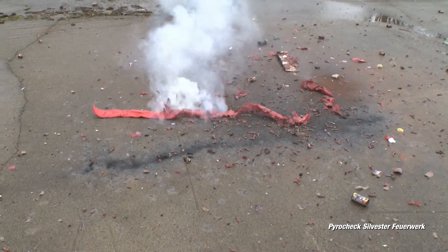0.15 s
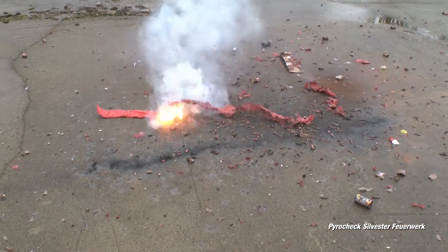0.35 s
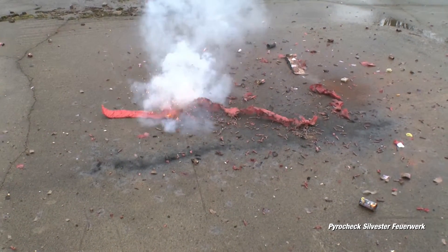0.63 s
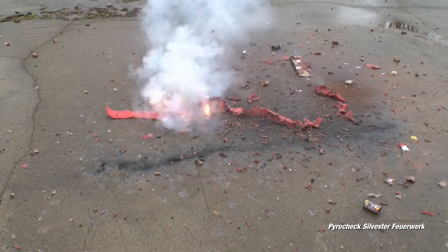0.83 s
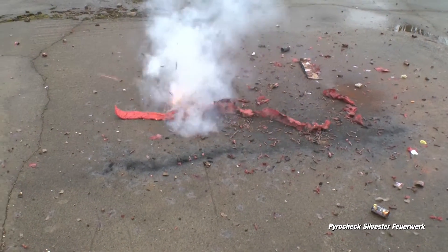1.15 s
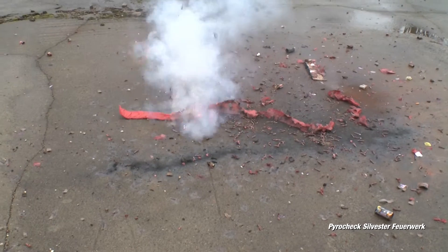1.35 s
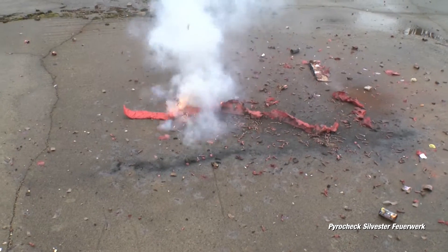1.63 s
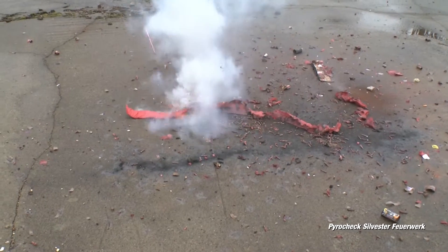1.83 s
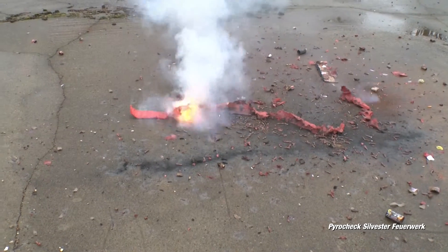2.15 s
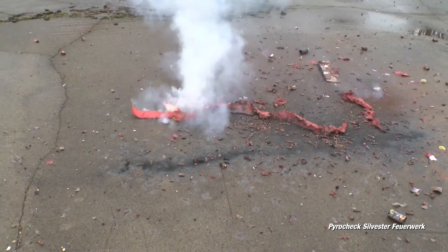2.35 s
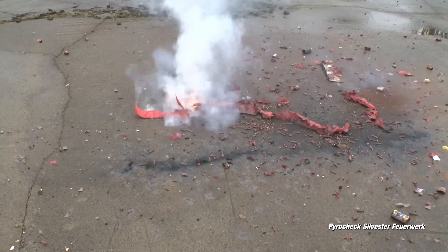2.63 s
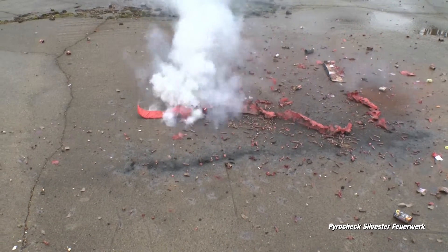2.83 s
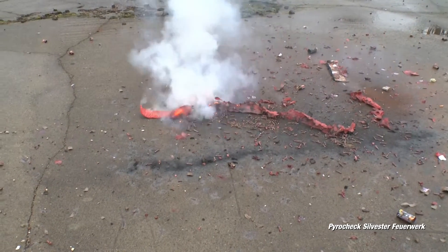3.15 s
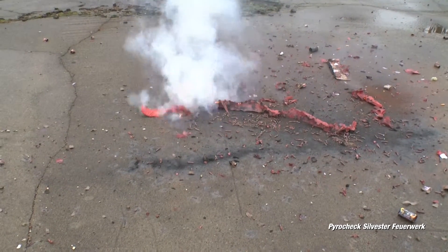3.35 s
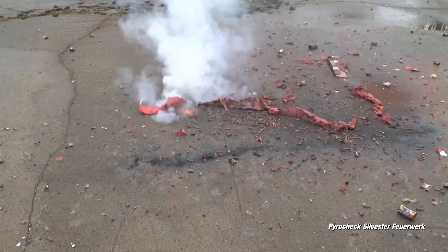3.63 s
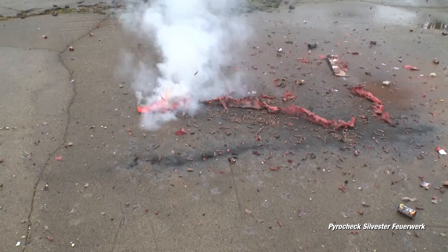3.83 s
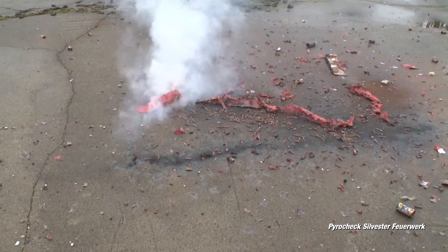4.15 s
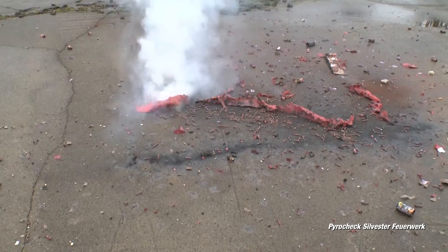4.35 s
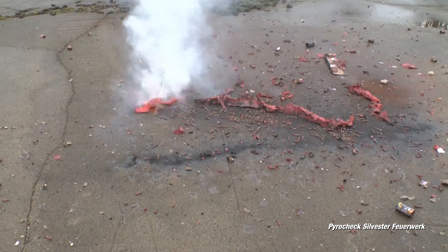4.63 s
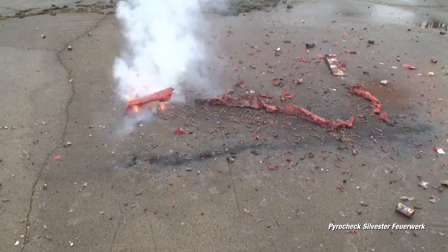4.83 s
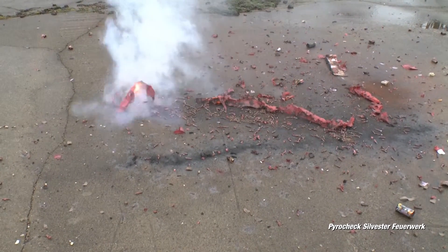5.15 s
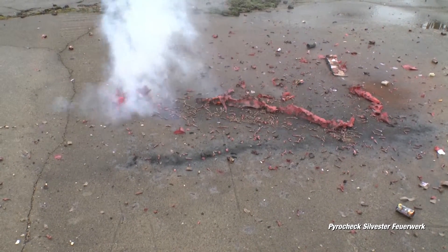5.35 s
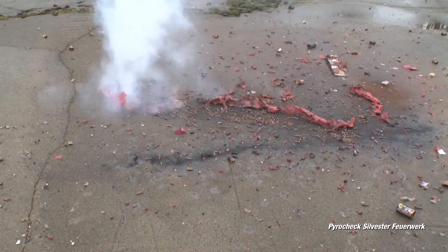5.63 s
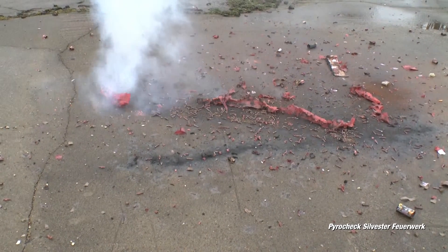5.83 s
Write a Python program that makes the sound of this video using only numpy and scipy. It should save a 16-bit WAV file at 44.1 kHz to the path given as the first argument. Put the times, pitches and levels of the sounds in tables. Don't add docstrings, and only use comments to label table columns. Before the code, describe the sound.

A string of firecrackers goes off on a concrete yard a few metres from a stereo microphone. Very short, hard cracks come in uneven clusters with small gaps, some bright and papery, others dull with a low thump. Each bounces off the ground and returns as quick, faint slaps from distant walls and trees. The loudest overload softly. The bangs grow sparser at the end, leaving fading echoes over faint open air.

```python
import sys
import numpy as np
from scipy import signal
from scipy.fft import rfft, irfft, next_fast_len
from scipy.io import wavfile
from scipy.ndimage import uniform_filter1d, minimum_filter1d

SR = 44100
rng = np.random.default_rng(int(sys.argv[2]) if len(sys.argv) > 2 else 0)


def field_ratio(decibels):
    return 10 ** (np.asarray(decibels, dtype=float) / 20)


def persist_wave(psi):
    counts = np.round(np.clip(psi, -1, 1) * 32767).astype(np.int16)
    wavfile.write(sys.argv[1], SR, np.atleast_2d(counts).T)


N = 264600


def along(points, hz):
    f, value = np.transpose(points)
    return np.interp(np.log(hz + 1), np.log(f + 1), value)


def filtered(x, response):
    m = next_fast_len(x.shape[-1] + 8192)
    return irfft(rfft(x, m) * response(np.fft.rfftfreq(m, 1 / SR)), m)[..., :x.shape[-1]]


def ringing(table, late):
    t = np.maximum(np.arange(1500) / SR - late, 0)
    out = 0
    for hz, width, db, way in table:
        out = out + np.sign(way) * field_ratio(db) * np.exp(-np.pi * width * t) * np.sin(2 * np.pi * hz * t)
    return out


def rung(x, table, late):
    return signal.fftconvolve(x, ringing(table, late)[None], axes=1)[:, :N]


def no_bass(hz):
    return 1j * hz / (120 + 1j * hz)


# (t/s, front level/dB, gas push level/dB, body level/dB)
SHRED_DULL = [(.2343,-7,-27.5,-15.5),(.3389,-12,-19,-9),(.3475,-21.5,-12,4),(.4383,-11.5,-23.5,-7),(.738,-35,-26,-17),(.7449,-14,-21,-6.5),(.8309,-15,-26.5,-8.5),(.8884,-17.5,-23.5,-5),(1.0162,-19,-22,-2.5),(1.2413,-14.5,-16,-5.5),(1.262,-17.5,-23,-7.5),(1.3228,-17,-54,-4.5),(1.4958,-15,-17.5,-9),(1.5889,-13,-19.5,-6.5),(1.6112,-25.5,-18,7.5),(2.1196,-18.5,-12,-0.5),(2.1872,-17.5,-24,-8.5),(2.8317,-12,-23.5,-12),(3.0524,-17,-37,-13.5),(3.2731,-18,-17,-2.5),(3.2981,-18,-8,1),(3.3534,-20,-19,0.5),(3.5069,-19,-8,-2),(4.2624,-14.5,-22,-7),(4.9524,-23.5,-1.5,-6),(4.9593,-19.5,-9,-4),(5.237,-24.5,-20,-4),(5.4196,-14.5,-19,-5.5),(5.659,-15.5,-8,-1.5)]
SHRED_EVEN = [(.4796,-15,-9,-4),(.5176,-13,-19.5,-11.5),(.543,-15.5,-36,-13),(.5514,-15.5,-36,-6),(.5573,-21,-15.5,-3),(.5678,-16,-29,-15),(.604,-28,-6,-1),(.7163,-15,-18.5,-3.5),(1.0843,-13,-21.5,-12),(1.105,-19.5,-20,-6),(1.3305,-20,-12.5,-0.5),(1.3384,-17.5,-8,-2),(1.614,-17,-25,-11),(1.6731,-13.5,-22,-17),(2.066,-12,-8,-7),(2.4763,-25.5,-16,6),(2.5759,-15,-12.5,-5),(3.1882,-32,-5,-19),(3.3905,-19,-23,-2),(3.8234,-17.5,-25,-2.5),(3.8475,-19,-7.5,0),(4.1901,-21.5,-9,2),(4.1923,-14,-21.5,-12),(4.6349,-20,-7.5,3.5),(4.949,-34,-34,-14),(4.9509,-15,-23,-10.5)]
SHRED_BRIGHT = [(.2966,-8,-29,-16),(.5952,-14,-28,-7),(.625,-20,-7,0),(1.5105,-34,-29,-23),(1.5922,-39,-16,-32),(1.7711,-13,-8,-10.5),(2.3526,-14.5,-17.5,-11),(2.4103,-13,-16.5,-9.5),(2.9099,-17.5,-10,-5),(2.9145,-17,-18,-10.5),(3.1532,-19,-9,0.5),(3.1654,-15,-15,-4.5),(3.1795,-14,-20,-14),(3.3385,-19.5,-22,-2.5),(3.6893,-15,-18,-6),(4.0136,-13.5,-21.5,-7.5),(4.0408,-14.5,-28,-8),(4.0542,-51,-32,-21),(4.0651,-17,-21,-9.5),(4.6564,-19,-24,-4),(4.6616,-18,-17,-3),(4.7166,-19,-8.5,-3),(4.9187,-15,-25,-9),(5.1378,-25,-4,7),(5.3285,-17,-26,-5)]
SPLIT_DULL = [(.1092,-16,-9,-1.5),(.2094,-11,-19,-5.5),(.5656,-12,-40,-11),(.7216,-44,-12,-8),(.8617,-13.5,-7,-7.5),(.942,-40,-9,-18),(1.1457,-21.5,-8,3.5),(1.5075,-25.5,-22,-1.5),(1.5717,-17,-25,-5),(2.1416,-31,-13,4.5),(2.1575,-16.5,-12,-2),(2.5062,-18,-20.5,-6),(2.931,-18.5,-29,-2.5),(3.8936,-26.5,-21,0),(4.222,-30.5,-10.5,-6),(4.237,-24.5,-8.5,3.5),(4.4062,-21.5,-7.5,2.5),(4.7875,-17.5,-2.5,-2),(4.8034,-12,-25,-14.5)]
SPLIT_EVEN = [(.261,-25,-18,1),(.3734,-32.5,-13,-1),(.6474,-11.5,-23,-10.5),(.7673,-25.5,-28,-6),(.9399,-18.5,-22,-1.5),(.9678,-13,-24,-11),(1.171,-23.5,-22,-6),(1.6709,-17.5,-14,0.5),(1.8066,-27,-26,-0.5),(2.5403,-27.5,-25,2),(2.7535,-21.5,-36,-2),(2.8513,-25.5,-8,7),(3.1889,-24,-12,0.5),(3.6318,-8.5,-23.5,-14.5),(3.7154,-17.5,-9,-6),(3.7737,-19.5,-18.5,-2),(3.941,-20,-25,-2.5),(4.4454,-28.5,-5.5,10.5),(4.7258,-32.5,-5,10.5),(4.798,-25.5,-9,-1),(4.8927,-26,-12.5,-6),(4.8975,-16,-7,-7.5),(4.9546,-16.5,-41,-17),(5.0704,-15,-20.5,-10.5),(5.0766,-29.5,-14,6)]
SPLIT_BRIGHT = [(.3211,-17.5,-40,-6.5),(.5246,-17.5,-32,-11),(.7888,-20.5,-15.5,1.5),(.9727,-15,-23,-4.5),(1.4693,-13,-25,-13),(1.8533,-11.5,-20.5,-13),(1.8809,-17.5,-25.5,-5),(2.3679,-12.5,-34,-13.5),(2.4256,-18.5,-21,-11),(2.5829,-14.5,-24,-8),(2.6156,-20.5,-14.5,-1),(2.7029,-12,-20,-6.5),(2.745,-17,-24,-3.5),(2.7713,-21,-28,-6),(2.8554,-24,-6.5,4),(2.9268,-20,-17,0),(2.9388,-15,-25.5,-20),(3.0635,-11.5,-30.5,-16.5),(3.3978,-18.5,-18.5,-3),(3.7241,-14.5,-22.5,-12),(3.8695,-13.5,-10,-8.5),(4.056,-17,-23,-9),(4.1307,-16.5,-22,-7),(4.6929,-18,-29,-4),(4.7227,-17,-11,-2),(4.7287,-21.5,-7.5,-8),(4.7557,-22.5,-21,0.5),(4.8281,-26,-8.5,3),(5.297,-24.5,-5.5,5)]
SHRED_DB, SPLIT_DB = -5, -9.5
DULL_DB, EVEN_DB, BRIGHT_DB = 3.5, -1.5, -9
KINDS = [(SHRED_DULL, SHRED_DB, DULL_DB), (SHRED_EVEN, SHRED_DB, EVEN_DB), (SHRED_BRIGHT, SHRED_DB, BRIGHT_DB),
         (SPLIT_DULL, SPLIT_DB, DULL_DB), (SPLIT_EVEN, SPLIT_DB, EVEN_DB), (SPLIT_BRIGHT, SPLIT_DB, BRIGHT_DB)]
BANGS = sorted((*row, tear_db, dull_db) for rows, tear_db, dull_db in KINDS for row in rows)
BANG_S, FRONT_DB, PUSH_DB, BODY_DB, TEAR_DB, TONE_DB = np.transpose(BANGS)


def bursts(db, shapes):
    out = np.zeros((2, N + shapes.shape[-1]))
    for s, gain, shape in zip(BANG_S, field_ratio(db), shapes):
        out[:, round(s * SR):][:, :shape.shape[-1]] += gain * shape
    return out[:, :N]


def blasts(spike_db, tear_db, tear_t60, apart, pan_db, size=400):
    t = np.arange(size) / SR
    draw = rng.standard_normal((len(BANGS), 3, size))
    shared = draw[:, :1] * np.abs(draw[:, :1])
    spits = field_ratio(-60 * t / tear_t60) * (shared + apart * draw[:, 1:])
    spits = spits / np.sqrt(np.sum(spits ** 2, (1, 2), keepdims=True))
    shapes = field_ratio(tear_db)[:, None, None] * spits
    shapes[:, :, 0] = field_ratio(spike_db + pan_db * draw[:, :1, 0] * [.5, -.5] + [.6, -.6])
    shapes[:, :, 1] = shapes[:, :, 0] * 0.11 * draw[:, :1, 1] * [1, -1]
    return shapes


# (f/Hz, level/dB)
SHOCK = [(300, -56), (1250, -30), (2500, 6), (4300, 6.5), (6200, 13), (7400, 7), (9000, 10), (10800, 5),
         (12000, 4), (15500, -7), (17000, 3)]
# (delay t/s, gain)
REPEATS = [(.00016, -.55), (.00025, -.4), (.00047, .3), (.00065, -.2), (.0021, .12)]


def cracks():
    shock = blasts(0, .5 * TEAR_DB - 1, tear_t60=.002, apart=.3, pan_db=1.5)
    paper = blasts(-23, TEAR_DB + 11.0, tear_t60=0.0041, apart=0.33, pan_db=2.0)
    repeated = lambda hz: 1 + sum(gain * np.exp(-2j * np.pi * hz * s) for s, gain in REPEATS)
    crack = paper - filtered(shock, repeated)
    mids = bursts(FRONT_DB + 0.37 * TONE_DB + 5.0, crack)
    treble = bursts(FRONT_DB - 0.44 * TONE_DB + 2, crack)
    upper = lambda hz: 1 / (1 + (6400 / (hz + 1)) ** 8)
    crossed = mids + filtered(treble - mids, upper)
    return filtered(crossed, lambda hz: field_ratio(along(SHOCK, hz)))


# (f/Hz, width/Hz, level/dB, first swing +-)
HOUSING = [(1463, 78, -16, 1), (1917, 238, 0.5, 1), (2433, 500, 5.5, 1), (3000, 630, 2, -1),
           (3290, 400, -1, 1), (3900, 840, 4, -1)]


def housing():
    hits = blasts(0, 0.2 * TEAR_DB - 8.5, tear_t60=0.013, apart=0.37, pan_db=5.5)
    return filtered(rung(bursts(FRONT_DB + BODY_DB, hits), HOUSING, 0.00015), no_bass)


# (f/Hz, width/Hz, level/dB, first swing +-)
GROUND = [(500.7, 133, 7.5, -1), (715, 59, -10.5, -1), (960, 2380, 17.5, 1), (1150, 440, -11.5, 1)]


def ground():
    hits = blasts(0, 0.31 * TEAR_DB - 3.0, tear_t60=0.048, apart=2.0, pan_db=0.0)
    hit_db = FRONT_DB + 0.41 * PUSH_DB + 0.28 * BODY_DB - 6.5
    return filtered(rung(bursts(hit_db, hits), GROUND, 0.0004), no_bass)


# (f/Hz, width/Hz, level/dB, first swing +-)
PUSH = [(138.3, 127.4, 3.5, 1), (343, 150, -2.5, -1), (66, 130, -10.5, -1)]
HEAVY = [(218, 153, 7, 1), (102, 62, -8.5, -1), (66.6, 76, -7.5, -1), (300, 1300, -17, 1)]


def gas():
    puffs = blasts(0, 0.13 * TEAR_DB - 0.5, tear_t60=0.016, apart=0.098, pan_db=4.5)
    heavy = np.clip((PUSH_DB + 13.0) / 6, 0, 1)[:, None, None]
    push = bursts(FRONT_DB + PUSH_DB + 8.0, puffs * (1 - heavy))
    thud = bursts(FRONT_DB + PUSH_DB + 2.5, puffs * heavy)
    return rung(push, PUSH, 0.0013) + rung(thud, HEAVY, 0.00046)


# (t/s,
# level/dB, f/Hz)
NOTES = [(0.1082, -8, 6660), (0.208, -2, 5900), (0.2326, -1, 5250), (0.2593, -16, 3380),
         (0.2957, -32, 6320), (0.3197, -4, 2800), (0.3376, -11, 5300), (0.4374, -14, 4200),
         (0.4783, -10, 3430), (0.5162, -6, 9400), (0.5501, -32, 2880), (0.5501, 3, 10300),
         (0.594, -18, 8550), (0.624, 2, 3400), (0.6464, -17, 9960), (0.7153, -3, 4030),
         (0.7437, 1, 4000), (0.7662, -14, 3310), (0.7876, -6, 3220), (0.8295, -5, 8800),
         (0.8604, -6, 4000), (0.8869, 3, 3950), (0.9388, -20, 2750), (0.9667, -8, 6490),
         (1.0151, -3, 5870), (1.0829, 2, 8700), (1.1039, -15, 4530), (1.1448, -4, 5800),
         (1.1702, -12, 5660), (1.2401, -14, 5130), (1.261, -1, 6460), (1.3219, -4, 6300),
         (1.4681, 4, 8600), (1.4945, 3, 6700), (1.5703, -12, 6250), (1.5878, -8, 6500),
         (1.6127, -12, 5270), (1.672, -19, 8380),
         (1.7702, -4, 10500), (1.8056, -20, 2800), (1.852, -16, 8400), (1.8794, -7, 9000),
                (2.065, 3, 3000), (2.1184, -7, 6300), (2.1403, -22, 2860), (2.1563, -12, 4100),
                (2.1857, -15, 5700), (2.3514, 3, 8400), (2.4092, 1, 8430), (2.4751, -5, 2730),
                (2.505, -6, 6100), (2.5389, -13, 8610), (2.5743, -8, 8200), (2.6143, -15, 2750),
                (2.7021, -21, 9450), (2.7435, -19, 2900), (2.7699, -2, 8750), (2.8308, -27, 5740),
                (2.8507, -21, 3750), (2.9086, -3, 9500), (3.0513, -1, 8870), (3.0622, -16, 8600),
                (3.1525, -4, 8500), (3.2718, -17, 5680), (3.2972, -11, 3900), (3.3371, -13, 4490),
                (3.389, 2, 8380), (3.4708, -31, 3100), (3.5057, 4, 4180),
         (3.6308, -24, 8700), (3.6881, -7, 8300), (3.7141, -2, 9500), (3.7724, -14, 4500),
              (3.8228, -6, 2800), (3.8463, -8, 3900), (3.8682, -5, 4400), (3.8922, -14, 3290),
              (3.9396, -4, 4160), (4.0129, 2, 4260), (4.0398, -17, 8400), (4.1291, -19, 9200),
              (4.189, -6, 2880), (4.2359, -16, 2860), (4.2624, -8, 4440), (4.405, -1, 4300),
              (4.4444, -7, 2780), (4.634, -8, 2680), (4.656, -15, 4600), (4.6914, -18, 2780),
              (4.7158, -7, 2770), (4.7557, -13, 2840), (4.7861, -2, 4640), (4.827, -22, 2930),
              (4.8964, -33, 6400), (4.8964, -15, 6650), (4.9178, -15, 9200), (4.9498, -11, 6560),
              (5.069, -16, 2830), (5.138, -20, 2870), (5.2366, -14, 2940), (5.296, -18, 2760),
              (5.3274, -9, 9600), (5.4188, -12, 6700), (5.5913, -42, 3080), (5.6577, -22, 4300)]
NOTE_DB, NOTE_LATE_S, NOTE_WIDTH_HZ = -7, .0001, 610


def notes():
    out = np.zeros((2, N + 400))
    t = np.arange(400) / SR
    envelope = np.exp(-np.pi * NOTE_WIDTH_HZ * t) * (1 - np.exp(-t / 0.00032))
    rows = NOTES
    for (s, db, hz), side in zip(rows, rng.standard_normal((len(rows), 1))):
        near = BANG_S[np.argmin(np.abs(BANG_S - s - .001))]
        if abs(near - s) < .004:
            gain = field_ratio(db + NOTE_DB + 1.3 * side * [[1], [-1]])
            out[:, round((near + NOTE_LATE_S) * SR):][:, :400] += gain * envelope * np.sin(2 * np.pi * hz * t)
    return out[:, :N]


# (t/s, level/dB, f/Hz)
THUMPS = [(0.1075, -29, 50), (0.21, -29, 50), (.5514, -28, 60), (0.7457, -43, 80), (1.7726, -35, 120),
          (2.066, -26, 75.4), (2.3534, -25.5, 50), (2.7029, -37, 80), (2.8317, -33, 134), (2.9105, -47, 69),
          (3.1654, -40, 70), (3.3544, -35, 70), (3.5086, -27, 109), (4.787, -35, 119), (5.1375, -25, 131),
          (5.297, -30, 191), (5.329, -29, 130), (5.4186, -30, 134)]
QUICK_HZ, SLAB_WIDTH = 95, .7


def thumps():
    out = np.zeros(N + 1500)
    fade = np.hanning(3000)[1500:] ** .5
    for s, db, hz in THUMPS:
        swing = ringing([(hz, SLAB_WIDTH * hz, db, hz - QUICK_HZ)], .0012)
        out[round(s * SR):][:1500] += swing * fade
    return out[:N]


# (f/Hz, likeness 0-1)
ALIKE = [(60, 0.88), (240, 0.95), (950, 0.59), (3770, 0.76), (15000, 0.86)]


def stereo_noise(size, spectrum):
    turn = lambda hz: np.arccos(np.clip(along(ALIKE, hz), -1, 1)) / 2
    shape = lambda hz: field_ratio(along(spectrum, hz)) * [np.cos(turn(hz)), np.sin(turn(hz))]
    mid, side = filtered(rng.standard_normal((2, size)), shape)
    pair = np.array([mid + side, mid - side])
    return pair / np.sqrt(np.mean(pair ** 2))


# (f/Hz, level/dB)
ECHO_COLOUR = [(35, -91), (60, -18), (108, -33), (294, -6.5), (398, -19), (579, -28), (991, -14),
               (1090, -15.5), (2190, 0.5), (3500, 0.5), (8710, -2.5), (11800, -6.5), (15800, -19.5)]
# (delay t/s, level/dB, smear t/s)
WALLS = [(0.0245, -38, 0.00081), (0.027, -33, 0.00085), (.075, -47.5, 0.01), (0.087, -39, 0.0056),
         (0.096, -42, 0.007), (.140, -45, 0.022), (0.172, -40, .0015), (0.184, -42, 0.027),
         (.217, -37, 0.0006), (.230, -36, 0.00045), (0.254, -43.5, 0.0072), (0.298, -50, 0.002)]
# (level/dB, t60 t/s)
SCATTER = [(-15.5, 0.02), (-31, 0.16), (-51, 0.99)]
# (delay t/s, f/Hz, width/Hz, level/dB)
FACES = [
    (0.0251, 3000, 1500, -27),
    (0.1731, 2600, 1300, -28),
    (.2305, 2400, 1500, -27.5),
]
AIR_LOSS_DB_S, GRAIN_DB = 64, 3.5


def echo_tail(power):
    hz, age, z = signal.stft(np.sqrt(power) * stereo_noise(SR, ECHO_COLOUR), SR, nperseg=64)
    grain = uniform_filter1d(rng.standard_normal(z.shape[1:]), size=7, axis=0) * np.sqrt(7)
    loss = AIR_LOSS_DB_S * np.outer((hz / 10000) ** 1.32, age)
    tail = signal.istft(z * field_ratio(GRAIN_DB * grain - loss), SR, nperseg=64)[1][:, :SR]
    for delay, face_hz, width, db in FACES:
        slap_hz = face_hz * (1 + 0.09 * rng.standard_normal())
        tail[:, round(delay * SR):][:, :1500] += ringing([(slap_hz, width, db, 1)], 0)
    return tail


def echoes(count=9):
    t = np.arange(SR) / SR
    power = sum(field_ratio(db - 60 * t / t60) ** 2 for db, t60 in SCATTER)
    for delay, db, smear in WALLS:
        age = np.maximum(t - delay, 0) / smear
        power = power + (field_ratio(db) * age * np.exp(1 - age)) ** 2
    shot_db = FRONT_DB + .5 * BODY_DB + 0.13 * PUSH_DB + 0.59 * TEAR_DB + 13
    out = np.zeros((2, N))
    for group in range(count):
        shots = np.zeros(N)
        for s, db in zip(BANG_S[group::count], shot_db[group::count]):
            shots[round(s * SR)] = field_ratio(db)
        out += signal.fftconvolve(shots[None], echo_tail(power), axes=1)[:, :N]
    return out


def before():
    return field_ratio(-56.0 - 60 * np.arange(N) / SR / 2.6) * stereo_noise(N, ECHO_COLOUR)


# (f/Hz, level/dB)
AIR = [(15, -42), (45, -20), (100, -7), (200, -11), (320, -16), (550, -13), (1000, -21), (2500, -12),
       (6700, -29), (11000, -38), (15500, -47)]


def air():
    return field_ratio(-59) * stereo_noise(N, AIR)


def scene():
    crackers = cracks() + housing() + ground() + gas()
    return crackers + notes() + thumps() + echoes() + before() + air()


# (f/Hz, level/dB)
LEAN = [(60, -0.5), (130, -0.5), (290, 0.0), (640, 0.1), (1410, 1.6), (3100, 2.5), (6820, 0.4),
        (15000, 1.9)]
# (f/Hz, radians left leads)
LEAD = [(11000, -0.078), (12800, -1.55), (15600, 0.48)]


def ports(x):
    lean = lambda hz: field_ratio(np.outer([.6, -.6], along(LEAN, hz))) * (1j * hz / (40 + 1j * hz)) ** 2
    return filtered(x, lambda hz: lean(hz) * np.exp(1j * np.outer([.5, -.5], along(LEAD, hz))))


# (f/Hz, level/dB)
STARVED = [(7000, -64), (10500, -56), (12500, -50), (16000, -48)]
BANG_DB = -39


def starved(x, size=256, count=9):
    hz, _, z = signal.stft(x, SR, nperseg=size)
    power = np.mean(np.abs(z) ** 2, axis=0)
    nearby = -minimum_filter1d(-power.sum(axis=0), size=count)
    bands = np.repeat(uniform_filter1d(power, size=4, axis=0)[2::4], 4, axis=0)
    bands = np.pad(bands, ((0, len(hz) - len(bands)), (0, 0)), mode="edge")
    strong = bands > nearby * field_ratio(along(STARVED, hz))[:, None] ** 2
    low = (hz < STARVED[0][0])[:, None]
    quiet = nearby < field_ratio(BANG_DB) ** 2
    return signal.istft(z * (strong | low | quiet), SR, nperseg=size)[1][:, :N]


def band_limit(x):
    return signal.sosfilt(signal.butter(12, 16970, fs=SR, output="sos"), x)


def record(dry):
    top_hz, slope = 16100, 60
    x = ports(dry)
    x = x / (1 + np.abs(x / .58) ** 4) ** (1 / 4)
    x = filtered(x, lambda hz: 1 / (1 + (hz / top_hz) ** slope))
    return band_limit(starved(x))


dry = scene()
out = record(dry)
persist_wave(out)
```